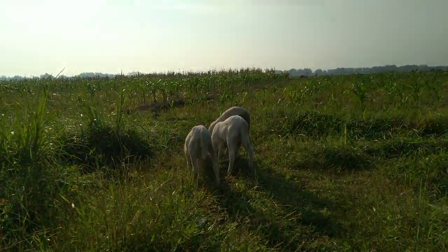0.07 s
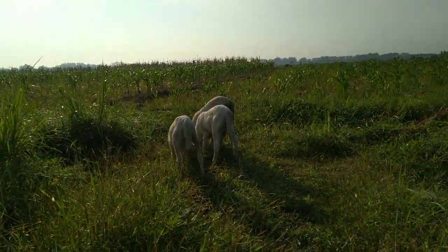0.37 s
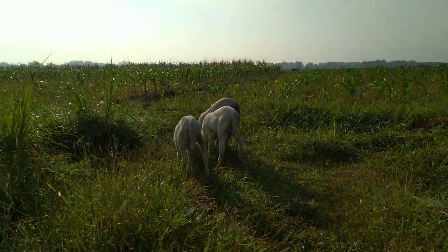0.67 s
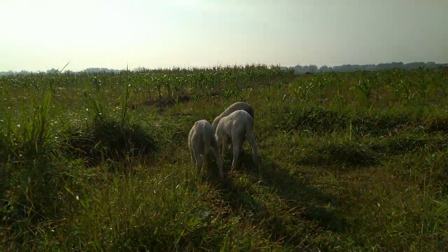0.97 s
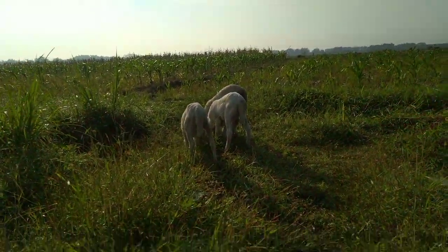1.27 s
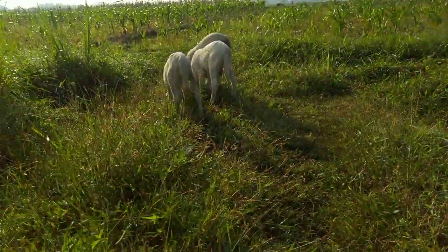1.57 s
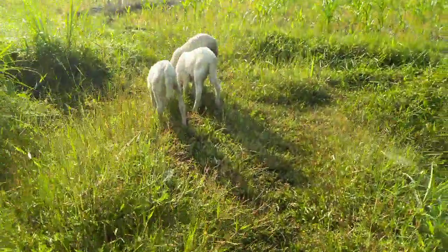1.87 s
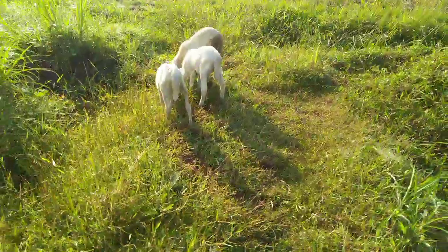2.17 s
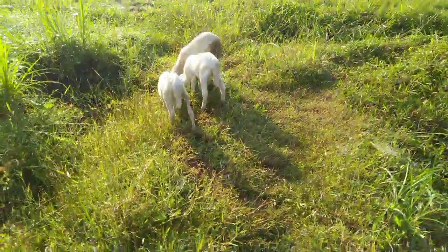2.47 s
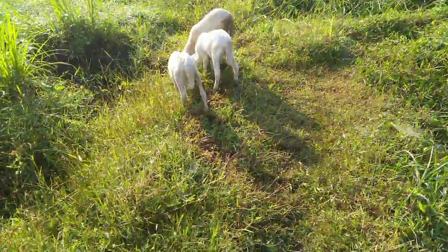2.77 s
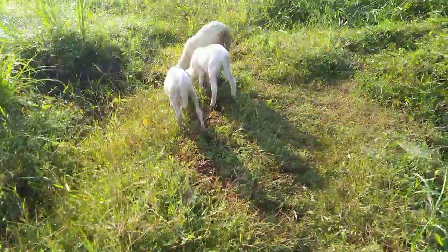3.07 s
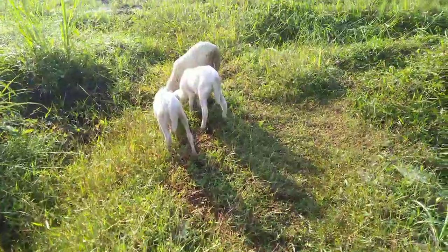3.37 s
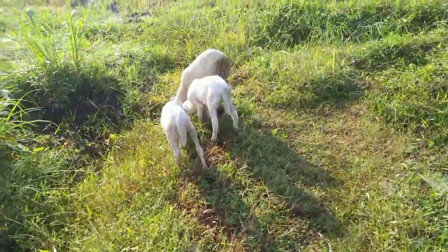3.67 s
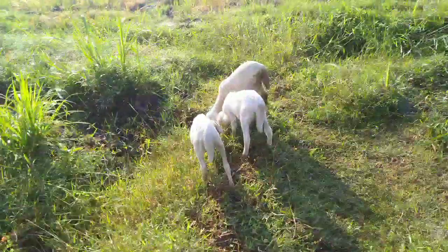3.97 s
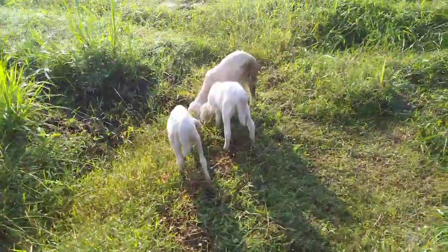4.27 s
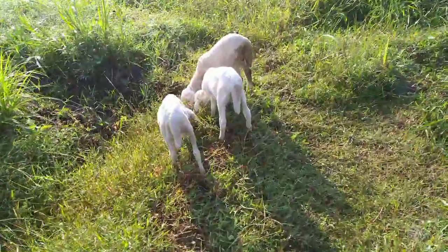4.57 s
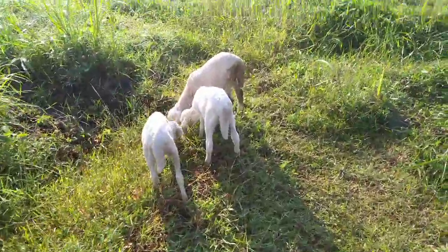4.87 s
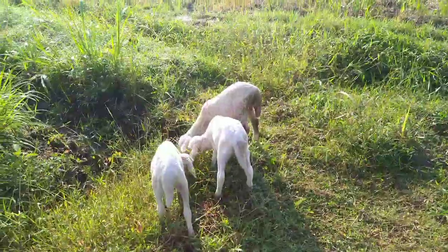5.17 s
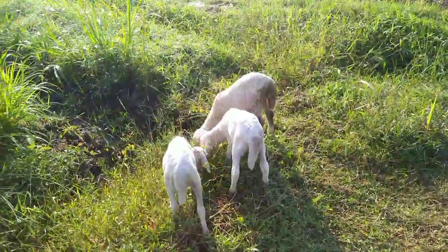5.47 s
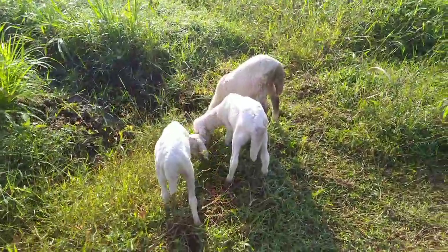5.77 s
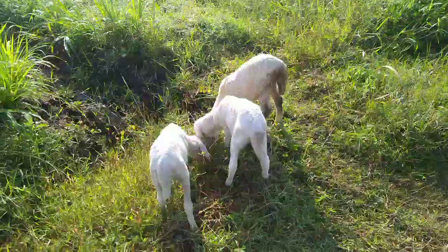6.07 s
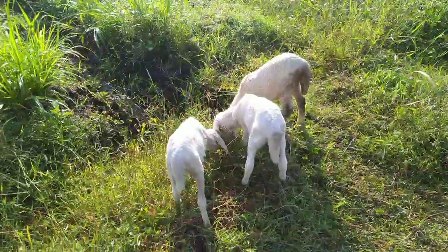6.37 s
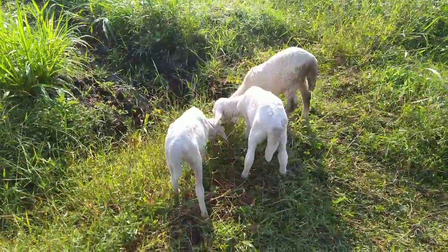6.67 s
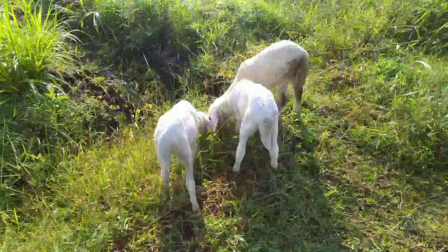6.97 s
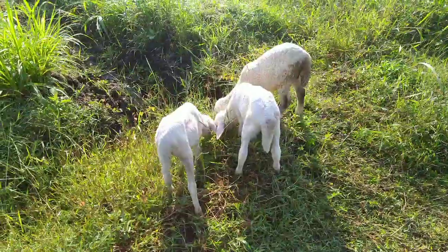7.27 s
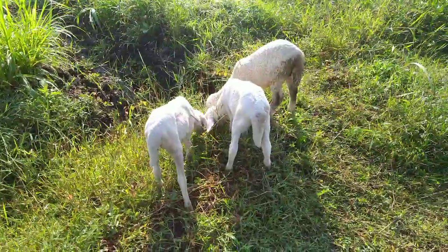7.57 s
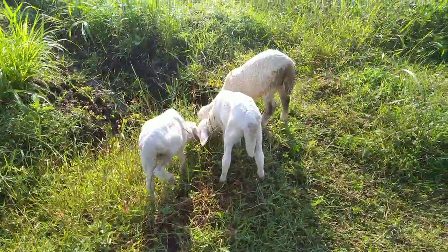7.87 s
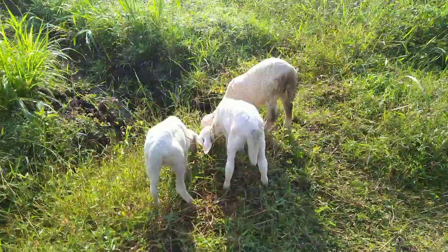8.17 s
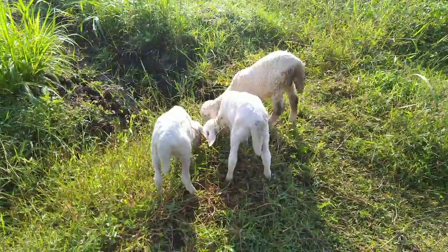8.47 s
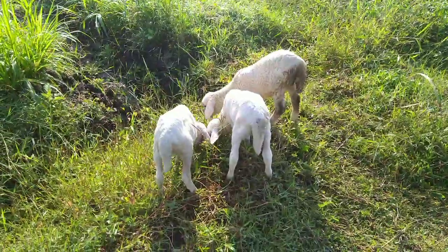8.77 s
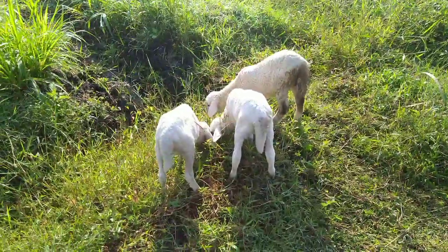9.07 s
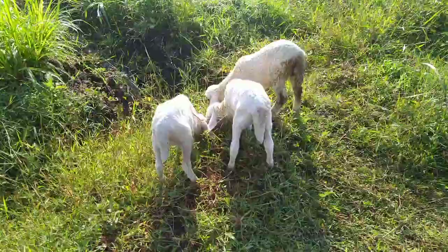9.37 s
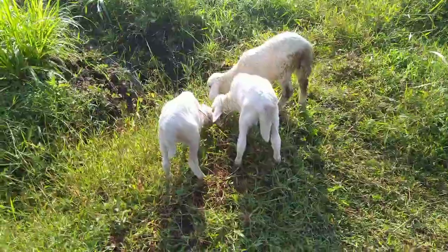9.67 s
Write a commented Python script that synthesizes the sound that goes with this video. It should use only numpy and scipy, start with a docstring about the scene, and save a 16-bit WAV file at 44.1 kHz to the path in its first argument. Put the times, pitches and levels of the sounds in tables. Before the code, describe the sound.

Hollow knocks, dull scuffs and rubbing come from fingers on a hand-held microphone, mainly on the left, over a low, gusty wind rumble in a field. About four seconds in, a sheep bleats once from a little way off, starting hoarse and then clearing. Faint crackles of torn grass and high insect trills run throughout, a small far bird whistles now and then, and the insects grow slightly toward the end.

```python
"""From the start a light wind rumbles over an open field, insects shrill and grazing sheep tear grass.
Fingers knock, scuff and slide on the hand-held recorder, mostly by its left port (microphone hole),
and press hardest around 2.5 s. At 3.5 s a small bird begins to whistle. Just after it one sheep
bleats, low and buzzy, some way off: pulses from its vocal folds ring its throat and mouth.
From about 8 s a second insect comes into full song on a lower note."""
import sys
import numpy as np
from scipy import signal
from scipy.fft import rfft, irfft, next_fast_len
from scipy.io import wavfile
from scipy.ndimage import uniform_filter1d

SR = 44100
rng = np.random.default_rng(int(sys.argv[2]) if len(sys.argv) > 2 else 0)


def persist_wave(psi):
    """Save psi, clipped to +-1, as 16-bit WAV."""
    counts = np.round(np.clip(psi, -1, 1) * 32767).astype(np.int16)
    wavfile.write(sys.argv[1], SR, np.atleast_2d(counts).T)


N = 437913
T = np.arange(N) / SR

# how high the sheep's voice is: (time [s], pitch [Hz])
BLEAT_PITCH = [(3.821, 123.5), (3.888, 128.4), (3.964, 135.3), (4.0, 133.1), (4.075, 136.2), (4.144, 137.1),
               (4.215, 134.8), (4.348, 133.3), (4.395, 129.8), (4.451, 121.5), (4.54, 125.5)]
# how the voice changes: (time [s], tuning of tongue, mouth and lips [factor], hoarseness [0-1])
VOICE_SHAPE = [(3.82, 0.97, 0.85), (3.92, 1.01, 0.75), (4.0, 0.985, 0.24), (4.12, 0.99, .11),
               (4.32, 0.97, 0.11), (4.41, 0.96, 0.24), (4.52, 1.035, 0.17)]
# the low throat tone, which falters as the mouth opens: (time [s], relative level [dB])
THROAT_LEVEL = [(3.83, 0), (3.866, -4), (3.91, 0), (4.03, -1.5), (4.07, -5), (4.096, -14), (4.128, -5.5),
                (4.246, -7), (4.296, -12), (4.35, -6), (4.51, -1.5)]
# where each part of the voice rings: (pitch [Hz], width before widening [Hz], relative level [dB])
THROAT_RINGS = [(785, 83, 22.5), (1310, 650, 1)]
TONGUE_RINGS = [(1765, 140, 0)]
MOUTH_RINGS = [(2430, 135, 15), (2583, 130, 8.5), (2300, 120, 10)]
LIP_RINGS = [(2870, 210, 5), (3240, 150, -16)]


def bleat(base_db=-48, hold_s=0.31, sag_db_per_s=17, jitter=0.009, quaver=0.00177, shimmer_db=3,
          rasp=4.8, widening=1.48, waver_db=3.3, tremor_db=0.8, left_lag_s=0.0003):
    """Sharp pulses from the vocal folds ring the throat and mouth; the voice starts hoarse and clears."""
    pitch, = in_time(BLEAT_PITCH)
    tuning, rough = in_time(VOICE_SHAPE)
    throat_db, = in_time(THROAT_LEVEL)
    start, end = BLEAT_PITCH[0][0], BLEAT_PITCH[-1][0]
    sounding = np.clip(np.minimum(T - start, end - T) / 0.014, 0, 1)
    # the effort swells, holds, then sags
    effort_db = base_db - 10 * (1 - ramp(start, length_s=0.087))
    effort_db -= sag_db_per_s * np.maximum(T - start - hold_s, 0)
    # opening the mouth favours the high rings; the voice is brightest when the lips gape
    opening = ramp(4.03, length_s=0.32) - ramp(4.31, length_s=0.44)
    gape = swell(4.15, length_s=0.048)
    cycles = np.cumsum(pitch * (1 + jitter * rough * drift(44) + quaver * drift(25.4))) / SR

    def pulses(phase):
        return rms_one(sum(np.cos(2 * np.pi * k * phase) for k in range(3, 29)))

    def ring(source, rings, stretch, level_db):
        voice = sum(from_db(db + waver_db * drift(12))
                    * glide(source, hz * stretch, widening * width, start, end)
                    for hz, width, db in rings)
        levelled = voice / np.sqrt(np.abs(uniform_filter1d(voice ** 2, size=1300)) + 1e-9)
        return levelled * from_db(effort_db + level_db + tremor_db * drift(15)) * sounding

    # when hoarse, the folds close a little early or late and let puffs of air through
    uneven = cycles + 0.02 * rough * drift(90)
    puffs = rms_one(np.exp(-2 * (cycles % 1)) * rng.standard_normal(N))
    hoarse = pulses(uneven) * from_db(shimmer_db * rough * drift(44)) + rasp * rough * puffs
    throat = ring(pulses(cycles), THROAT_RINGS, np.ones(N), throat_db - 2)
    tongue = ring(hoarse, TONGUE_RINGS, tuning, -5 * opening + 3 * gape)
    mouth = ring(hoarse, MOUTH_RINGS, tuning, -2 + 5.5 * opening)
    lips = ring(hoarse, LIP_RINGS, tuning, -10 + 5.5 * opening + 6 * gape)
    left, right = throat * pan(1.3) + tongue * pan(8.3) + (mouth + lips) * pan(13)
    return np.array([np.interp(T - left_lag_s, T, left), right])


# finger knocks: (time [s], thud gain [dB], thud top [Hz], tick gain [dB], tick top [Hz],
# left over right [dB], bounce delay [s], bounce strength [0-1], ring pitch [Hz], ring gain [dB])
KNOCKS = [(0.0708, -21, 1000, -7.5, 12500, 21, 0.0012, 0.65, 854, 0),
          (0.0823, 18.5, 265, 2, 16000, -18, 0.00077, 0.12, 1100, -6),
          (0.099, -5, 1500, -24, 4000, -2, 0.00087, 0.21, 1000, -12),
          (0.141, -5, 1580, -26, 9000, 6, 0.00086, 0.24, 2500, -24),
          (0.177, 6.5, 2240, 3, 3470, 11, 0.00026, 0.47, 1660, 14.5),
          (0.4708, 27.5, 99, -27, 2770, 31, 0.0026, 0.13, 600, -13),
          (1.603, 1.5, 1610, -24, 5700, 34, 0.0011, 0.13, 1200, -7),
          (1.61, 22, 150, -53, 4960, 27, 0.00092, 0.1, 600, -26),
          (1.62, 26, 169, -40, 5000, 38, 0.0021, 0.2, 600, -19),
          (1.814, 0, 1620, -22, 5500, 18, 0.00068, 0.055, 1500, -16),
          (1.856, -3, 360, -13, 2600, 11, 0.0011, 0.27, 1200, -28),
          (1.936, 23, 99, -15.5, 2800, 19, 0.0013, 0.17, 1200, -30),
          (2.296, 10, 1410, -28, 16200, 38, 0.00084, 0.054, 1200, -17),
          (2.384, -8.5, 1200, -22, 3500, 29, .001, 0.18, 1500, -22),
          (2.4347, 10, 550, -24, 12000, 44, 0.0016, 0.36, 1150, 17),
          (2.6664, 21.5, 342, 21.5, 2160, 50, 0.00033, 0.25, 2300, 7),
          (2.6746, 27, 290, 6, 3030, 44, 0.0019, 0.37, 1300, -2),
          (2.715, 17, 250, -23, 3100, 42, 0.0016, 0.2, 900, -6),
          (3.696, 7, 420, -25, 4100, 31, 0.0013, 0.18, 900, -16),
          (3.7308, 14.5, 366, 4.5, 10900, 49, 0.00125, 0.37, 2430, 2.5),
          (3.798, -2, 180, -23, 15000, 7, 0.0011, .2, 11000, -29),
          (4.3826, 0.5, 790, -36, 4630, 29, 0.0012, 0.15, 900, -17),
          (5.544, 1, 1044, -15, 3720, 25, 0.0014, 0.16, 1300, -23),
          (5.584, 18, 324, 7.5, 12200, 45, 0.00017, 0.58, 850, 12),
          (6.463, -15, 180, -29, 16000, 8, 0.0014, .2, 11500, -17),
          (6.5269, 10, 280, -9, 2390, 34, 0.00093, 0.13, 1390, -6),
          (6.612, -30, 100, -12, 3470, 9, 0.0013, 0.58, 700, -16),
          (6.806, 21.5, 102, -13, 3000, 29, 0.0032, 0.63, 1350, -5),
          (8.391, 29.5, 200, -20, 12000, 41, .0016, .4, 2450, -6.5)]


def knocks(grit=0.0086, grit_s=0.0057):
    """A knock is a sharp tick and a soft push of air into the port; the hollow under the finger rings."""
    out, t = np.zeros((2, N)), T[:SR // 20]
    touch = 1.0 * (t == 0)
    for s, thud_db, thud_hz, tick_db, tick_hz, side_db, bounce_s, bounce, ring_hz, ring_db in KNOCKS:
        gritty = touch + grit * rng.standard_normal(len(t)) * np.exp(-t / grit_s)
        tick = from_db(tick_db) * cut(cut(gritty, 1140, "high", order=1), tick_hz, order=3)
        tick -= resonate(tick, hz=8300, width_hz=1800)  # a dip in the treble
        thud = from_db(thud_db) * cut(touch, thud_hz)
        ring = from_db(ring_db) * resonate(touch, ring_hz, 0.14 * ring_hz)
        blow = tick - thud + ring
        # the finger lands twice in quick succession, which makes the knock hollow
        second_blow = bounce * np.interp(t - bounce_s, t, blow, left=0)
        at = round(s * SR)
        out[:, at:at + len(t)] += (blow + second_blow) / np.hypot(1, bounce) * pan(side_db)
    # the ports pass no steady pressure, so each push swings back in a low thump
    return cut(out, 60, "high", order=4)


# air trapped under a fingertip:
# (peak time [s], pitch then [Hz], pitch fall [octaves/s], rise [s], fade [s], level [dB])
SQUEEZES = [(2.4351, 478, 205, 0.0026, 0.008, -11), (2.7164, 270, 120, 0.0025, 0.0033, -16),
            (3.733, 256, 260, 0.0029, .003, -20)]
# the case giving under the heavier presses: (time [s], pitch [Hz], fade [s], level [dB])
THUMPS = [(2.437, 64.6, 0.011, -16), (2.676, 79.5, 0.01, -12), (3.735, 103, 0.0064, -25),
          (5.589, 110, 0.0066, -29)]


def presses():
    """A fingertip seals the left port: the trapped air rings at a falling pitch and the case thumps."""
    out = np.zeros(N)
    for s, hz, octaves_per_s, rise, fade, db in SQUEEZES:
        t = np.clip(T - s, -3 * rise, 10 * fade)
        cycles = hz * (1 - 2 ** (-octaves_per_s * t)) / (octaves_per_s * np.log(2))
        loudness = np.exp(np.where(t < 0, -(t / rise) ** 2, -t / fade))
        out += from_db(db) * loudness * np.cos(2 * np.pi * cycles)
    for s, hz, fade, db in THUMPS:
        t = np.clip(T - s, 0, 20 * fade)
        loudness = 2 * t / fade * np.exp(1 - 2 * t / fade)
        out -= from_db(db) * loudness * np.sin(2 * np.pi * hz * t)
    return cut(out, 36, "high") * pan(41)


# skin scuffing the port: (peak time [s], rise [s], fall [s], level [dB])
SCUFFS = [(.135, 0.073, 0.018, -44.5), (.2, 0.03, 0.052, -42.5), (.47, 0.0069, 0.014, -46),
          (1.416, 0.022, 0.085, -50.5), (1.62, 0.0088, 0.029, -44.5), (1.79, 0.065, 0.13, -49),
          (1.951, 0.015, 0.019, -48), (2.434, 0.0045, 0.017, -19.5), (2.678, 0.0035, 0.0064, -30),
          (2.725, 0.0097, 0.017, -23.5), (2.978, 0.13, 0.0056, -47), (3.019, 0.019, 0.016, -37),
          (3.733, 0.0035, 0.013, -26.5), (5.585, 0.0014, 0.0032, -25.5), (5.646, 0.022, 0.033, -35),
          (5.688, 0.013, 0.026, -37.5), (9.01, 0.0038, 0.026, -46)]
# a scuff's mix of low and high sound: (frequency [Hz], relative level [dB])
SCUFF_TONE = [(60, 14), (150, 8), (400, 4), (800, -1), (1500, -3.5), (3000, -10), (5000, -21),
              (6300, -28.5), (8000, -43), (16000, -33)]


def scuffs(grain_db=2.5):
    """Skin drags over the left port in dull, grainy bursts."""
    force = np.zeros(N)
    for s, rise, fall, db in SCUFFS:
        from_peak = np.maximum((s - T) / rise, (T - s) / fall).clip(0, 50)
        force += from_db(db) * np.exp(-from_peak)
    return noise(SCUFF_TONE) * force * from_db(grain_db * drift(127)) * pan(43)


# fingers stroking the case: (middle time [s], length [s], rub [dB], crunch [dB], hiss [dB])
STROKES = [(0.144, 0.066, -47.5, -61, -51), (0.672, 0.029, -61, -54, -59), (0.902, 0.082, -58.5, -56, -60),
           (2.55, 0.12, -55, -55, -57), (2.89, 0.23, -57, -55, -62.5), (3.148, 0.052, -53.5, -77, -67),
           (3.8, 0.15, -54.5, -76, -63), (4.643, 0.21, -55, -56, -59), (4.96, 0.15, -55, -69, -63),
           (5.23, 0.063, -60, -56.5, -67), (5.462, 0.19, -51, -68, -55.5), (5.685, 0.17, -51, -54, -62),
           (7.455, 0.2, -54, -53.5, -51), (9.333, 0.43, -56, -57, -52.5), (9.799, 0.39, -57, -61.5, -58)]
# the faint rub of the grip between strokes: (time [s], level [dB])
GRIP = [(0, -78), (1.3, -88), (2.2, -63), (3.4, -62), (4.3, -57), (5.3, -57.5), (6.1, -63), (7.1, -62.5),
        (7.7, -58), (8.7, -70.5), (9.93, -68)]
# the mix of low and high in the rub, crunch and hiss: (frequency [Hz], relative level [dB])
RUB_TONE = [(300, 10.5), (1500, 6.5), (2000, 6), (2800, 10), (3700, 7), (4900, 7), (6200, 4.5), (8000, -37),
            (12000, -22)]
CRUNCH_TONE = [(1700, -16), (2200, -5), (2800, -1), (3500, -5), (4400, -11)]
HISS_TONE = [(3000, -18), (6000, -4), (9000, 0), (11000, 3.5), (12500, 1.5), (13500, 1), (16000, -8.5)]


def slides(grip_hiss_db=-66, hiss_follows=0.34, grain_db=1.62, crunch_grain_db=3, catches_per_s=40):
    """Skin slides and catches on the case: a rub and a crunch to the left, a fine hiss on both sides."""
    grip_db, = in_time(GRIP)
    rub_power, crunch_power = from_db(grip_db) ** 2, np.zeros(N)
    hiss_power = from_db(grip_hiss_db + hiss_follows * (grip_db - grip_db.mean())) ** 2
    for s, length, rub_db, crunch_db, hiss_db in STROKES:
        stroke = swell(s, length)
        rub_power += (from_db(rub_db) * stroke) ** 2
        crunch_power += (from_db(crunch_db) * stroke) ** 2
        hiss_power += (from_db(hiss_db) * stroke) ** 2
    rub = noise(RUB_TONE) * np.sqrt(rub_power) * pan(6.7)
    grains = rms_one(noise(CRUNCH_TONE) * from_db(crunch_grain_db * drift(180)))
    crunch = grains * np.sqrt(crunch_power) * pan(12)
    catches = (rng.random(N) < catches_per_s / SR) * rng.standard_normal((2, N))
    crackle = from_db(-9.5) * rms_one(resonate(catches, hz=16500, width_hz=4000))
    hiss = (noise(HISS_TONE) + crackle) * np.sqrt(hiss_power) * pan(-1.1)
    return (rub + crunch + hiss) * from_db(grain_db * drift(39))


# the clearest crackles and ticks: (time [s], relative level [dB], ring pitch [Hz])
CRACKLES = [(.644, -53.5, 716), (.768, -52.5, 890), (1.004, -59, 850), (1.067, -52, 840), (1.122, -55, 604),
            (1.141, -56, 815), (1.258, -61, 595), (1.413, -47, 1100), (1.668, -45.5, 1400),
            (1.716, -47, 1300), (1.771, -44.5, 2720), (2.823, -40, 776), (5.164, -51, 680),
            (5.858, -46.5, 1640), (5.945, -47, 1500), (6.018, -59, 1010), (6.081, -52.5, 1360),
            (6.404, -41, 11500), (6.474, -45, 755), (6.699, -50, 610), (7.014, -56, 810), (7.098, -51, 775),
            (7.651, -53, 1150), (7.759, -53, 800), (7.94, -50, 11000), (8.137, -48, 680),
            (8.261, -57, 4020), (8.333, -46.5, 4200), (9.01, -44, 790), (9.534, -40, 10000),
            (9.781, -39, 11600), (9.884, -47, 840)]


def crackles(faint_per_s=8, fade_s=0.0036, gain_db=1):
    """Brief crackles and ticks: grass tearing, with a few soft finger taps on the recorder."""
    out, t = np.zeros((2, N)), T[:SR // 30]
    chances = rng.random((150, 3))[:round(faint_per_s * T[-1])]
    faint_ones = [(when * (T[-1] - 0.05), -59 + 6 * loud, 650 * 5 ** (high * high))
                  for when, loud, high in chances]
    for s, db, hz in CRACKLES + faint_ones:
        burst = rng.standard_normal((3, len(t))) * np.exp(-t / fade_s)
        crackle = cut(resonate(burst, hz, 0.47 * hz), 1.24 * hz)
        stereo = crackle[0] + 0.58 * crackle[1:]  # one shared part, and one for each side
        at = round(s * SR)
        out[:, at:at + len(t)] += (from_db(db) * stereo / np.abs(stereo).max())[:, :N - at]
    return out * from_db(gain_db) * pan(1.5)


# gusts on the ports: (middle time [s], length [s], level [dB], left over right [dB])
GUSTS = [(0.427, 0.8, -35.5, 21), (1.574, 0.69, -28, 34), (2.2, 0.6, -35.5, 10), (2.368, 0.17, -28.5, 16),
         (3.053, 0.086, -32, -3), (3.707, 0.079, -33, 1), (3.944, 1, -44, -22), (5.578, 0.04, -31, 17),
         (6.04, 0.094, -35.5, -8)]
# the mix of low and high in the gusts and in the steady air: (frequency [Hz], relative level [dB])
GUST_TONE = [(25, -22), (45, -3), (60, 4), (100, -10.5), (160, -26.5), (300, -39), (700, -51.5)]
AIR_TONE = [(15, -47), (25, -22), (43, -14), (64, -0.5), (116, -5), (137, -10.5), (173, -16), (367, -34.5),
            (549, -37), (2150, -43), (4170, -45), (4690, -48.5), (5150, -47.5), (7000, -59.5), (9100, -76),
            (15400, -120)]
# how alike the steady air sounds on the two sides: (frequency [Hz], likeness [0-1])
AIR_LIKENESS = [(40, 0.8), (80, 1), (250, 0.86), (640, 0.79), (1400, 0.00059), (3000, 0), (15000, 0)]


def wind(air_db=-46.5, breeze_db=-50.5, lowest_hz=32):
    """Air rumbles steadily at both ports, while a breeze and gusts buffet each port on its own."""
    steady = from_db(air_db) * noise(AIR_TONE, AIR_LIKENESS)
    power = (from_db(breeze_db) * pan(9)) ** 2
    for s, length, db, side_db in GUSTS:
        power = power + (from_db(db) * swell(s, length) * pan(side_db)) ** 2
    return cut(steady + np.sqrt(power) * noise(GUST_TONE), lowest_hz, "high", order=4)


# whistles that arch in pitch:
# (time [s], length [s], top pitch [Hz], arch size [Hz], place of the top [0-1], relative level [dB])
WHISTLES = [(3.518, 0.083, 4660, 50, 0.4, -58), (4.7, 0.092, 4650, 70, 0.0, -57),
            (5.773, .125, 4850, 70, 0, -64), (6.444, 0.11, 4800, 100, 0.26, -57.5),
            (6.677, 0.13, 4980, 733, 0.63, -54.5), (7.21, 0.19, 4780, 70, 0.2, -60),
            (7.8, 0.057, 4870, 150, 0.9, -55), (7.877, 0.039, 4760, 60, 0.04, -53),
            (8.381, 0.13, 4740, 90, 0.2, -63)]


def bird(waver=0.0083, flutter_db=3, rasp_db=1.5, scatter_db=-6, scatter_s=0.021):
    """A far bird's thin, slightly raspy whistles blur as they scatter in the tall grass."""
    song = np.zeros(N)
    wobble = 1 + waver * drift(190)
    for s, length, top_hz, arch_hz, top_at, db in WHISTLES:
        span = slice(round(s * SR), round((s + length) * SR))
        progress = np.linspace(0, 1, len(T[span]))
        hz = (top_hz - arch_hz * np.abs(2 * (progress - top_at)) ** 2.4) * wobble[span]
        loudness = np.minimum(1, 10 * np.minimum(progress, 1 - progress))
        song[span] += from_db(db - 1.5) * loudness * np.sin(2 * np.pi * np.cumsum(hz) / SR)
    song *= from_db(flutter_db * drift(59) + rasp_db * drift(500))
    t = T[:SR // 8]
    echoes = rng.standard_normal((2, len(t))) * np.exp(-t / scatter_s)
    scattered = signal.fftconvolve(song[None], echoes / np.linalg.norm(echoes[0]), axes=1)[:, :N]
    return (song + from_db(scatter_db) * scattered) * pan(10)


# the pulsing insect:
# (time [s], relative level [dB], pitch [Hz], pulse rate [1/s], pulse depth [dB], pitch swing [Hz])
TRILL = [(0, -67, 9200, 8, 3, 50), (1.5, -84.5, 9550, 8, 1, 50), (2.4, -72, 9400, 9, 0, 50),
         (5.7, -66.5, 9000, 7.9, 7.5, 50), (6.1, -74, 9400, 8.5, 1, 50), (6.5, -64, 9380, 9.1, 2, 30),
         (7.3, -63, 9380, 8.3, 2, 29.8), (7.9, -61, 9320, 7, 1, 40), (8.3, -63, 9480, 7, 3, 60),
         (8.8, -59, 9400, 5.9, 3.3, 120), (9.05, -67, 9400, 9.6, 16, 170), (9.25, -64, 9200, 6.2, 11, 80),
         (9.93, -63, 9200, 6.3, 0, 50)]


def insects(pulse_peak_s=8.6, blur_hz=150, flicker_db=1.5, second_joins_s=7.97, chorus_db=-64.5):
    """Tiny wing strokes: one trill swells into pulses over a high chorus; a lower one grows late on."""
    trill_db, hz, rate, depth_db, swing_hz = in_time(TRILL)
    shared_db = 0.31 * (trill_db - trill_db.mean())  # the others partly follow the trill's level
    pulse_count = np.cumsum(rate * (1 + 0.0625 * drift(3))) / SR
    beat = 2 * np.pi * (pulse_count - np.interp(pulse_peak_s, T, pulse_count))
    phase = 2 * np.pi * np.cumsum(hz - swing_hz * np.sin(beat)) / SR  # each pulse falls in pitch
    blur_a, blur_b = cut(rng.standard_normal((2, 2, N)), blur_hz)
    note = blur_a * np.cos(phase) + blur_b * np.sin(phase)
    pulsing = from_db(depth_db * np.cos(beat) + flicker_db * drift(13))
    trill = rms_one(note * pulsing) * from_db(trill_db - 3)
    second_db = -75.5 + 11 * ramp(second_joins_s, length_s=0.6) + shared_db
    second = shrill(hz=8975, width_hz=260) * from_db(second_db + flicker_db * drift(5.9))
    chorus = shrill(hz=10820, width_hz=850) * from_db(chorus_db + shared_db)
    return (trill + second) * pan(0.27) + chorus * pan(-33)


# thin chirps from much farther away: (time [s], level [dB])
FAR_CHIRPS = [(1.0, -74), (5.3, -64), (5.92, -69), (6.85, -68), (7.14, -74), (7.85, -67), (8.15, -75),
              (8.55, -74)]


def far_chirps():
    """Distance smears each chirp into a short, narrow hiss."""
    loudness = sum(from_db(db) * swell(s, length_s=0.078) for s, db in FAR_CHIRPS)
    return shrill(hz=5950, width_hz=450) * loudness * pan(1.8)


def from_db(db):
    """Turn decibels into a number to multiply by."""
    return 10 ** (np.asarray(db) / 20)


def rms_one(x):
    """Scale a sound so that its average power is 1."""
    return x / np.sqrt(np.mean(x ** 2) + 1e-20)


def pan(db):
    """Left and right gains: positive dB turns the right side down, negative dB the left."""
    return from_db([[min(db, 0)], [min(-db, 0)]])


def ramp(start_s, length_s):
    """Rise evenly from 0 to 1."""
    return np.clip((T - start_s) / length_s, 0, 1)


def swell(middle_s, length_s):
    """A bell-shaped rise and fall."""
    return np.exp(-np.minimum(2 * ((T - middle_s) / length_s) ** 2, 50))


def drift(rate_hz):
    """A smooth random wobble, about 1 in size; a higher rate wobbles faster."""
    step, warm_up = 40, 2000
    r = np.exp(-2 * np.pi * rate_hz * step / SR)
    slow = signal.lfilter([1], [1, -2 * r, r * r], rng.standard_normal(N // step + warm_up + 2))
    slow = rms_one(slow[warm_up:])
    return np.interp(np.arange(N) / step, np.arange(len(slow)), slow)


def in_time(rows):
    """Join a table's rows with straight lines: one curve for each column after the time."""
    times, *columns = np.transpose(rows)
    return [np.interp(T, times, column) for column in columns]


def at_hz(rows, hz):
    """Read between the rows of a frequency table, with octaves evenly spaced."""
    frequencies, values = np.transpose(rows)
    return np.interp(np.log(hz), np.log(frequencies), values)


def cut(x, hz, kind="low", order=2):
    """Keep what lies below hz ("low") or above it ("high")."""
    sections = signal.butter(order, np.clip(hz, 10, 0.45 * SR), kind, fs=SR, output="sos")
    return signal.sosfilt(sections, x + 1e-18)


def resonate(x, hz, width_hz):
    """Ring at one pitch; a narrower width rings longer."""
    r = np.exp(-np.pi * width_hz / SR)
    gain = (1 - r * r) / 2
    return signal.lfilter([gain, 0, -gain], [1, -2 * r * np.cos(2 * np.pi * hz / SR), r * r], x + 1e-18)


def glide(x, hz, width_hz, start_s, end_s, block=128):
    """Ring twice over at a pitch that moves in small steps."""
    out, state = np.zeros(N), np.zeros((2, 2))
    r = np.exp(-np.pi * width_hz / SR)
    gain = (1 - r * r) / 2
    for i in range(round(start_s * SR), round(end_s * SR), block):
        stage = [gain, 0, -gain, 1, -2 * r * np.cos(2 * np.pi * hz[i] / SR), r * r]
        out[i:i + block], state = signal.sosfilt([stage, stage], x[i:i + block], zi=state)
    return out


def noise(tone, likeness=None):
    """Stereo noise with a given mix of low and high, and a given likeness of left and right."""
    size = next_fast_len(N)
    hz = np.maximum(np.fft.rfftfreq(size, 1 / SR), 1)
    alike = np.clip(at_hz(likeness, hz), -1, 1) if likeness else 0
    edge_fade = np.minimum(hz / tone[0][0], 1) ** 2 * np.minimum(tone[-1][0] / hz, 1) ** 2
    shared, opposed = rfft(rng.standard_normal((2, size))) * from_db(at_hz(tone, hz)) * edge_fade
    spectrum = np.sqrt(1 + alike) * shared + np.sqrt(1 - alike) * opposed * [[1], [-1]]
    return rms_one(irfft(spectrum, size)[:, :N])


def shrill(hz, width_hz):
    """A narrow stereo hiss around one pitch."""
    band = resonate(rng.standard_normal((2, N)), hz, width_hz)
    return rms_one(resonate(band, hz, width_hz))


def scene():
    """The field, and the hand on the recorder."""
    field = bleat() + wind() + insects() + bird() + far_chirps()
    return field + crackles() + knocks() + presses() + scuffs() + slides()


def record(dry, dip_depth=0.64, top_hz=15900):
    """The whole sound is slightly hollowed near 8 kHz, and the very highest sound is cut off."""
    dipped = dry - dip_depth * resonate(dry, hz=7850, width_hz=1000)
    return signal.sosfilt(signal.ellip(10, 0.1, 80, top_hz, fs=SR, output="sos"), dipped)


dry = scene()
out = record(dry)
persist_wave(out)
```